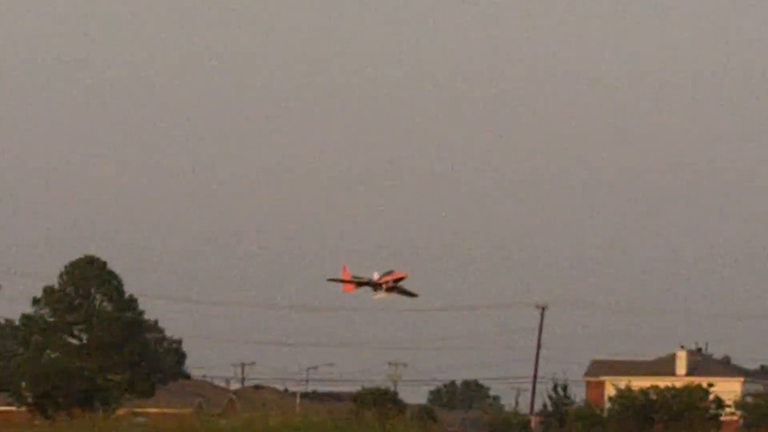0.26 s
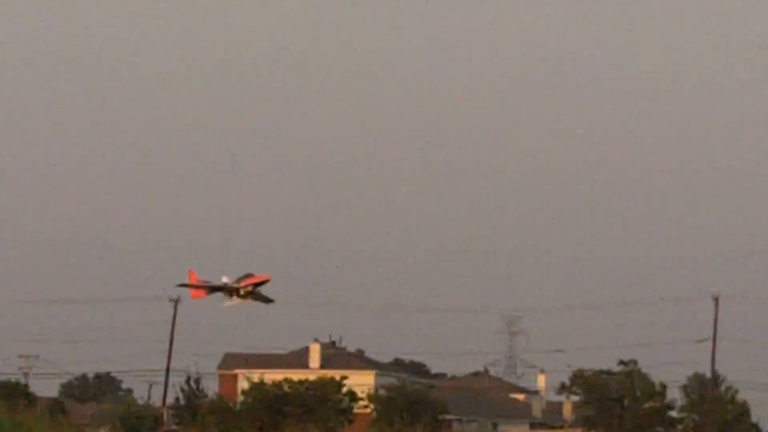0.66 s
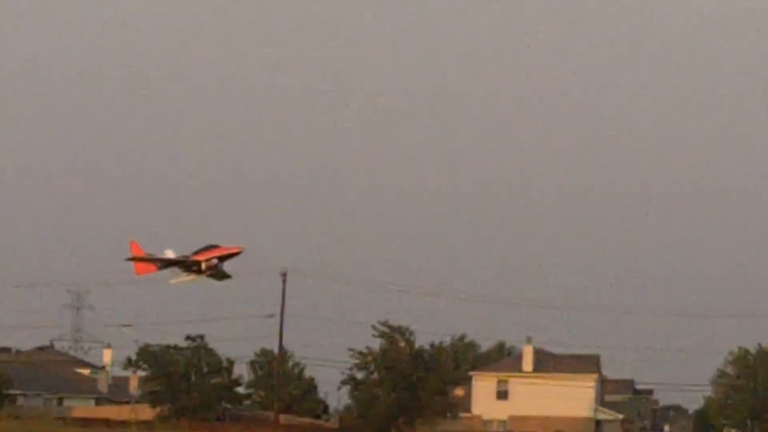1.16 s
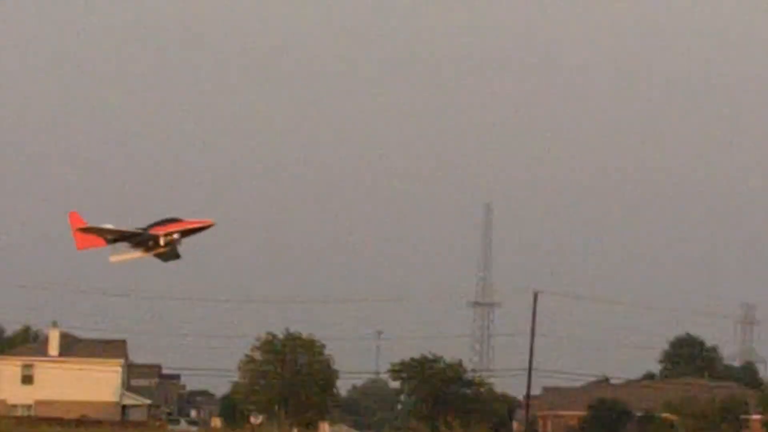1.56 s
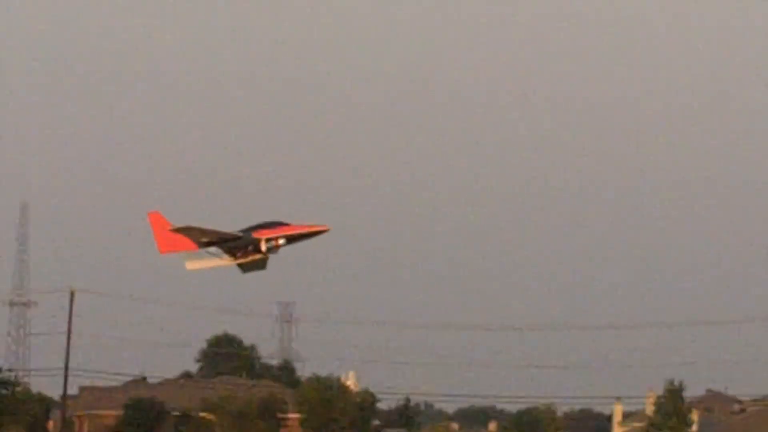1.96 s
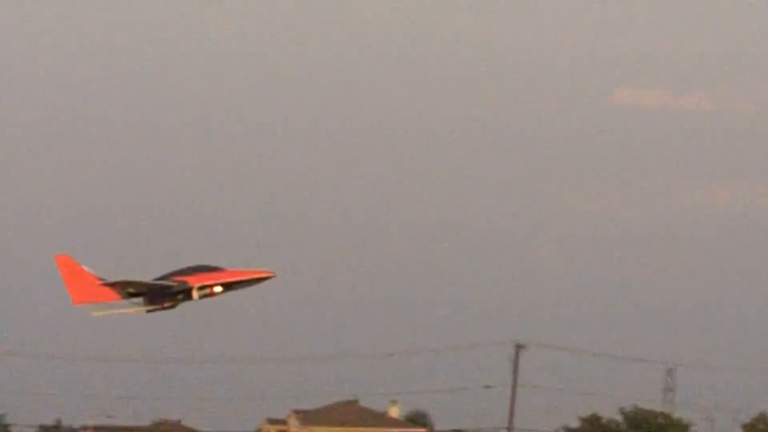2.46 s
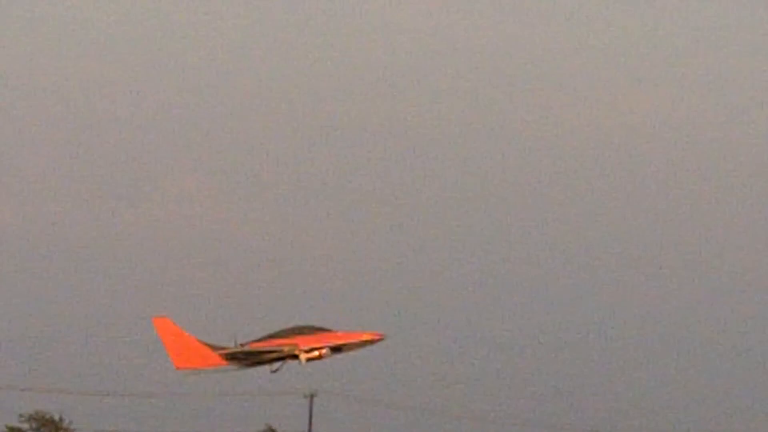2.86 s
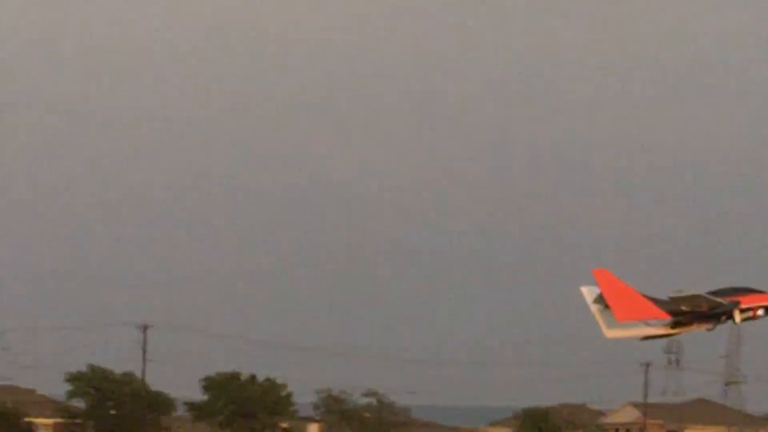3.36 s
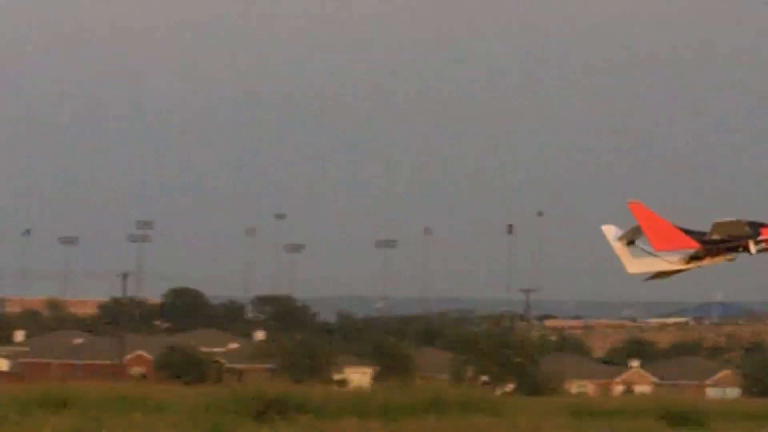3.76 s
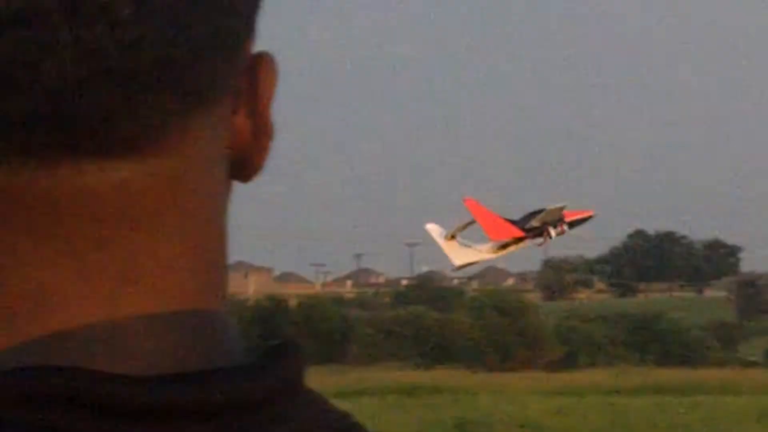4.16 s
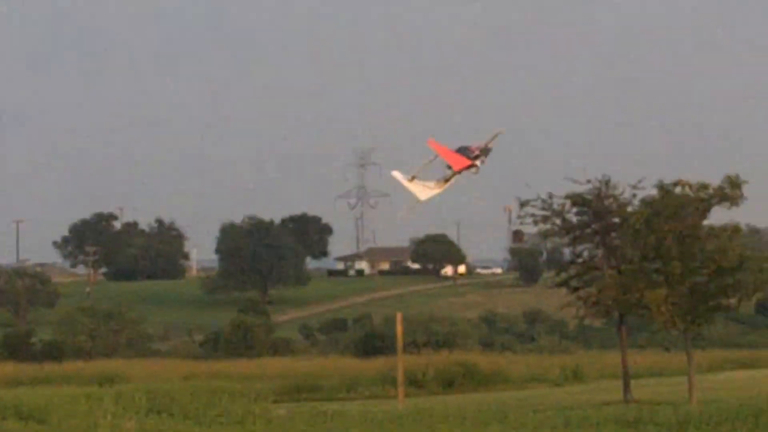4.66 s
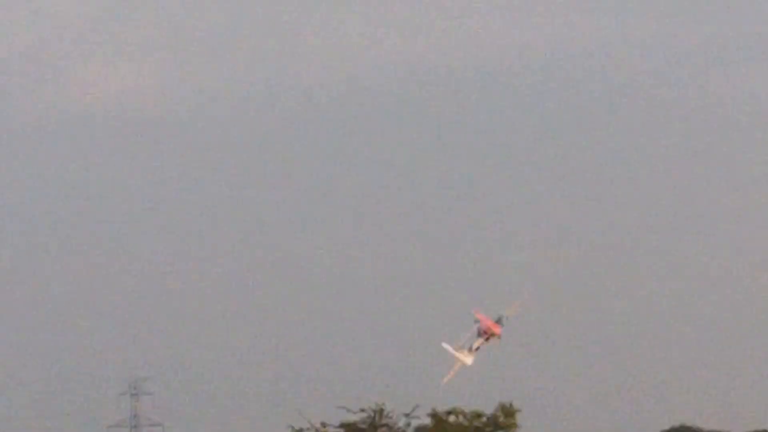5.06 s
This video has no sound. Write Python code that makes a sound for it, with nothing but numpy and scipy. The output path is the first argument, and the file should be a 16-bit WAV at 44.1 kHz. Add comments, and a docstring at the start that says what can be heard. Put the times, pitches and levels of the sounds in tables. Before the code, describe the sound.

Outdoors over an open grassy field, wind buffets a single microphone and one heavy low thump comes early. A small electric model plane approaches with a buzzing propeller hum and thin motor whine, speeds up around three seconds, passes, and leaves in airy hiss. Faint chirps and dull taps sound nearby; a sharp tick comes near the end.

```python
"""A small electric model plane with a two-blade propeller comes in over a field, in wind that buffets one microphone.
An early wind thump leads; then faint chirps and dull taps sound nearby, as enveloped sines and struck resonances.
The drive whine swells and the blade tones, sines on multiples of the shaft rate, rise as the throttle opens.
The plane passes and climbs away in a brighter hiss of filtered noise, and a sharp tick sounds near the end.
Below and around it lie a low drone that swells and a steady treble band, perhaps insects, both of noise."""
import sys
import numpy as np
from scipy import signal
from scipy.fft import rfft, irfft, next_fast_len
from scipy.io import wavfile
from scipy.ndimage import uniform_filter1d, map_coordinates

SR = 44100
rng = np.random.default_rng(int(sys.argv[2]) if len(sys.argv) > 2 else 0)


def transcribe(signal):
    """Save signal, clipped to [-1, 1], as a 16-bit WAV file at the path in sys.argv[1]."""
    frames = np.atleast_2d(signal).T
    limited = np.clip(frames, -1, 1)
    pcm = np.round(limited * 32767).astype(np.int16)
    wavfile.write(sys.argv[1], SR, pcm)


N = 234832
T = np.arange(N) / SR   # time [s]
SWING_FROM_DB = -52   # level from which blade tones and whine lines swing

# Buffeting of the microphone: (time [s], level [dB])
BUFFET_LEVEL = [(0, -33), (.08, -24), (.36, -24), (.46, -29), (.73, -39), (.89, -30.5), (1.2, -38.5),
                (1.39, -29.5), (1.7, -39.5), (2.05, -39.5), (2.95, -40), (3.1, -28), (3.33, -34.5),
                (3.5, -33), (4.09, -31), (4.2, -39.5), (4.55, -30.5), (4.76, -44), (4.99, -28), (5.32, -32)]
# Spectrum of the buffeting: (frequency [Hz], relative density [dB per Hz])
BUFFET_SPECTRUM = [(7.1, -4), (12, 7.5), (70, -13), (91, -74.5), (150, -120)]


def from_db(db):
    """Gain of a dB value."""
    return 10 ** (np.asarray(db) / 20)


def rms_one(x):
    """Scale to rms 1."""
    return x / np.sqrt(np.mean(x ** 2) + 1e-20)


def in_time(rows):
    """Columns of a curve table, sample by sample."""
    s, *columns = np.transpose(rows)
    return [np.interp(T, s, c) for c in columns]


def drift(rate_hz):
    """Slow random wander of rms 1: noise through two equal low-pass poles, computed on every 40th sample."""
    pole = np.exp(-2 * np.pi * rate_hz * 40 / SR)
    steps = rng.standard_normal(N // 40 + 2002)
    slow = signal.lfilter([1], [1, -2 * pole, pole ** 2], steps)[2000:]   # skip the run-in
    return np.interp(np.arange(N) / 40, np.arange(len(slow)), rms_one(slow))


def coloured(spectrum):
    """Noise with the given spectrum, rms 1."""
    size = next_fast_len(N)
    hz, db = np.transpose(spectrum)
    grid_hz = np.maximum(np.arange(size // 2 + 1) * SR / size, 1)
    shape = from_db(np.interp(np.log(grid_hz), np.log(hz), db, left=-90, right=-90))
    return rms_one(irfft(rfft(rng.standard_normal(size)) * shape, size)[:N])


def bump(middle_s, width_s, db):
    """A bell-shaped change of level in dB."""
    return db * np.exp(-((T - middle_s) / width_s) ** 2)


def fades_of(order, rows):
    """Sum of the momentary level changes listed for one order, in dB."""
    return sum(bump(*row[1:]) for row in rows if row[0] == order)


def swing(db, share, group_db):
    """Level in dB of a tone that follows its group's swing by a share; a negative share moves against it."""
    return SWING_FROM_DB + db + share * (group_db - SWING_FROM_DB)


def tone(phase, db, shimmer_db, blur_rad):
    """A sine around the given rms level that air turbulence shakes in level and phase."""
    gain = np.sqrt(2) * from_db(db + shimmer_db * drift(6.12))
    return gain * np.sin(phase + blur_rad * drift(5.3) + rng.uniform(0, 2 * np.pi))


def strike(at_s, level_db, contact_s, modes, smooth=0):
    """Each contact is a short dying rustle of force, on a smooth push if any, that rings the modes."""
    out, rustle = np.zeros(N), rng.standard_normal(N)
    for s, blow_db, length in zip(at_s, level_db, contact_s):
        part = slice(int(s * SR), int((s + .08) * SR))
        age = (T[part] - T[part][0]) / length
        push = (rustle[part] + smooth) * age * np.exp(-age) / np.sqrt(length * SR / 4)
        for hz, db, t60 in modes:
            r, w = from_db(-60 / (t60 * SR)), 2 * np.pi * hz / SR
            ring = signal.lfilter([0, np.sin(w)], [1, -2 * r * np.cos(w), r * r], push)
            out[part] += from_db(blow_db + db) * ring
    return out


def shaft_turn():
    """Angle of the propeller shaft in radians; the rotor's inertia rounds every change of speed."""
    # Shaft speed as heard: (time [s], rate [Hz])
    speed = [(0.05, 190.1), (0.22, 196.6), (0.45, 195), (0.65, 191.2), (0.85, 192.6), (1.45, 192),
             (1.85, 191.2), (2.27, 190.6), (2.45, 195.6), (2.87, 193.8), (2.95, 197.7), (3.15, 219.9),
             (3.35, 231.2), (3.76, 235.3), (4.08, 241.7), (4.3, 241), (4.72, 237.8), (4.95, 238.9),
             (5.3, 236.7)]
    shaft_hz = uniform_filter1d(in_time(speed)[0], size=3000)
    return 2 * np.pi * np.cumsum(shaft_hz) / SR


def blade_tones(turn):
    """The blades sound tones on multiples of the shaft rate, in three groups with their own levels."""
    # Group levels: (time [s], low tones [dB], middle tones [dB], high tones [dB])
    groups = [(0.05, -64.5, -52, -75), (0.65, -60.5, -53, -76.5), (0.9, -55.5, -51, -62),
              (1.4, -53, -50, -64), (1.65, -48, -53, -63), (2.25, -45, -66, -79), (2.5, -43.5, -62, -62),
              (2.9, -52, -63, -67.5), (3.15, -41.5, -71, -76.5), (3.4, -39.5, -58.5, -70),
              (3.8, -47, -62, -63), (4.1, -43.5, -54, -59), (4.4, -50, -61.5, -58),
              (4.75, -58.5, -52.5, -56.5), (5.3, -65, -56, -56)]
    # Tones that swing: (multiple of shaft rate, level re SWING_FROM_DB [dB], share of the group's swing)
    low_tones = [(3, -7.5, 0.345), (4, 0.3, 1), (6, -4, 0.348), (8, -6.5, 0.24)]
    middle_tones = [(10, -2, 0.42), (12, -0.65, 1), (14, -18, -0.25), (16, -17.5, -0.45)]
    # Higher tones: (multiple of shaft rate, level re the high curve [dB])
    high_tones = [(20, -10), (22, -11), (28, -11.5), (30, -9), (32, -9.5), (34, -14), (36, -8.5), (42, -18)]
    # Tones that drop out or stand out as the plane turns: (multiple, middle [s], width [s], change [dB])
    fades = [(3, 0.6, 0.24, -3.5), (3, 2.93, 0.24, 7.5), (3, 3.423, 0.17, -3.5), (3, 4.92, 0.21, -16.5),
             (4, 5.5, 0.0975, -21), (6, 3.18, 0.095, -28), (6, 4.25, 0.26, 3), (8, 0.62, 0.34, -6),
             (8, 2.224, 0.189, -10), (8, 2.88, 0.07, -12), (8, 3.07, 0.084, 10), (8, 2.8, 0.063, -24),
             (8, 3.45, 0.11, 3.5), (4, 4.63, 0.1204, 5), (12, 4.29, 0.17, 3), (14, 3.5, 0.058, 8),
             (8, 4.2, 0.15, 5), (10, 0.09, 0.38, -5.5), (4, 5.27, .08, 10), (10, 1.998, 0.14, -17),
             (10, 3.25, 0.162, -13), (10, 4.146, 0.118, -14), (12, 2.45, 0.11, -7),
             (12, 3.876, 0.0878, -25), (12, 4.4, 0.17, -3.5), (14, 0.5, 0.27, -14), (14, 3.2, 0.0985, -15),
             (14, 3.97, 0.23, 9), (14, 4.9, 0.12, 12), (16, 2.4, 0.206, 6.5), (16, 4.171, 0.121, 11.5),
             (16, 2.98, 0.1196, -10.5)]
    # Tones that surface for a while: (multiple, start [s], end [s], level at full swell [dB])
    passing = [(2, 2.5, 3.23, -54.5), (2, 5, 6.3, -57), (18, -17.5, 5.28, -59.5), (30, 2.5, 3.6, -74.5),
               (9, 3, 3.02, -60), (7, 3, 3.8, -52), (24, 3.5, 4.7, -54), (24, 5, 5.1, -56.5),
               (28, 5, 5.5, -62), (24, 0.8, 1.8, -67.5), (7, 4.5, 4.81, -59.5), (48, 2.5, 3.01, -66)]

    low_db, middle_db, high_db = in_time(groups)
    out = np.zeros(N)
    for group_db, tones in ((low_db, low_tones), (middle_db, middle_tones)):
        for k, db, share in tones:
            level_db = swing(db, share, group_db) + fades_of(k, fades)
            out += tone(k * turn, level_db, shimmer_db=1.0, blur_rad=0.32)
    for k, db in high_tones:
        # a slow random fade wavers each high tone
        level_db = high_db + db + 1.66 * drift(0.69)
        out += tone(k * turn, level_db, shimmer_db=4.5, blur_rad=0.98)
    for k, start, end, db in passing:
        swell = np.sin(np.pi * np.clip((T - start) / (end - start), 0, 1))
        out += swell * tone(k * turn, db, shimmer_db=1.5, blur_rad=0.237)
    return out


def drive_whine(turn):
    """The motor drive whines at its Doppler-shifted switching rate, with commutation sidebands above."""
    # Whine level: (time [s], level [dB])
    whine_level = [(0, -87), (.8, -76), (1.1, -76), (1.5, -69), (2.0, -75.5), (2.45, -55), (2.7, -57),
                   (3.0, -48.5), (3.27, -55.5), (3.36, -75), (3.45, -66), (3.55, -59.5), (3.85, -60),
                   (3.97, -72), (4.12, -63), (4.27, -75), (4.5, -62.5), (4.65, -83.5), (5.3, -74)]
    # Lines 0, 6 and 12 shaft orders up: (level re SWING_FROM_DB [dB], share of swing, gain flying away [dB])
    lines = [(-12, 0.35, 2.5), (0.1, 0.98, 4), (-15, 0.415, -7.5)]
    # Lines that drop out or stand out: (shaft orders up, middle [s], width [s], change [dB])
    fades = [(0, 3.28, 0.214, 10.5), (0, 3.7, 0.1575, 8), (12, 1.1, 1.2, 3), (12, 1.85, 0.056, -11),
             (12, 3.09, 0.092, 1), (12, 3.39, .1, -14), (12, 4.4, .5, -10)]
    switch_hz, speed_m_per_s, sound_m_per_s = 7557, 14.8, 343
    nearest_m, nearest_s = 44, 3.7

    along_m = speed_m_per_s * (T - nearest_s)
    away = along_m / np.hypot(along_m, nearest_m)   # -1 coming straight on, 1 flying straight off
    heard_hz = switch_hz * (1 - away * speed_m_per_s / sound_m_per_s)
    switch_phase = 2 * np.pi * np.cumsum(heard_hz) / SR
    whine_db, = in_time(whine_level)
    out = np.zeros(N)
    for k, (db, share, away_db) in zip((0, 6, 12), lines):
        line_db = swing(db, share, whine_db) + away_db * away + fades_of(k, fades)
        out += tone(switch_phase + k * turn, line_db, shimmer_db=1.5, blur_rad=0.19)
    return out


def patchy(x, patch_db, patch_hz, patch_s):
    """Slow random patches of the spectrum lift and dim, like turbulence."""
    hz, s, z = signal.stft(x, SR, nperseg=1024)
    knots = rng.standard_normal((90, 40))
    places = np.meshgrid(hz / patch_hz, s / patch_s, indexing="ij")
    field = map_coordinates(knots, places, order=3, mode="wrap")
    return signal.istft(z * from_db(patch_db * field), SR, nperseg=1024)[1][:N]


def airflow():
    """Propeller wash and wing noise: four noise bands that brighten once the plane shows its tail."""
    # Airflow: (time [s], level of the wash [dB], level of the top treble [dB])
    flow = [(0, -55.5, -67.5), (.9, -56, -64.5), (1.7, -58, -66.5), (1.85, -58.5, -68), (2.0, -56.5, -65),
            (2.9, -59.5, -67.5), (3.3, -56, -64), (3.6, -55.5, -62.5), (3.88, -55, -58),
            (3.96, -54.5, -64.5), (4.12, -52, -54), (4.27, -57, -67), (4.42, -52.5, -56),
            (4.55, -49, -57.5), (4.7, -47.5, -58), (4.9, -49, -58), (5.3, -51.5, -63)]
    # Spectra from low to high: (frequency [Hz], relative density [dB per Hz])
    body = [(120, -54), (200, 0), (281, -8.5), (380, -12.5), (455, -10.5), (919, -4.5), (1180, -5),
            (1910, -13.5), (2200, -20), (2860, -78), (4840, -120)]
    edge = [(1700, -1.5), (2200, 2), (2700, 0.5), (3200, -0.5), (3800, 0), (4600, -5), (5200, -6.5)]
    hiss = [(4000, -18.5), (4600, -5.5), (5200, -7), (5700, 2.5), (6000, 0), (6400, 2), (7000, -4.5),
            (7600, -5), (9000, -8.5)]
    top = [(7000, -15), (8000, -5.5), (9000, 0.5), (10000, -7), (11000, -11), (12500, -17.5), (15500, -34)]

    wash_db, top_db = in_time(flow)
    body_db = -48.5 - 0.21 * T   # sags slowly
    edge_db = -1 + np.interp(T - 0.11, T, wash_db)   # trails the wash by 0.11 s
    bands = ((body_db, body), (edge_db, edge), (wash_db, hiss), (top_db, top))
    noise = sum(from_db(db) * coloured(shape) for db, shape in bands)
    return patchy(noise, patch_db=1.7, patch_hz=455.6, patch_s=0.463)


def over_grass(x):
    """Direct sound plus an inverted ground echo: a comb whose teeth glide as the path changes."""
    # Echo off the grass: (time [s], delay [ms], level [dB])
    echo = [(0, .69, -14.5), (.9, 0.67, -14.5), (1.2, .74, -15), (1.7, 0.8, -9.5), (2.0, 0.802, -16.5),
            (2.3, .85, -17), (3.0, .88, -22), (3.6, 0.828, -15), (4.2, 0.83, -10), (4.6, 0.88, -9),
            (5.3, 0.94, -7.5)]
    delay_ms, echo_db = in_time(echo)
    late = map_coordinates(x, [np.arange(N) - delay_ms * SR / 1000], order=3, mode="nearest")
    late = signal.lfilter(*signal.butter(1, 8900, fs=SR), late)   # grass swallows the top
    return x - from_db(np.minimum(echo_db, 0)) * late


def dull_taps():
    """Soft contacts ring a few low modes, and brighter modes that die sooner."""
    # Taps: (time [s], relative level [dB], added level of the bright modes [dB], contact [s])
    taps = [(1.659, -34, -5, 0.0041), (1.741, -37.5, 1, 0.00433), (1.795, -37, 1, 0.004),
            (2.023, -33.5, -3.5, 0.0064), (2.438, -33, 0.5, 0.0044), (3.319, -25, -9.5, 0.0023)]
    # Modes: (frequency [Hz], relative level [dB], t60 [s])
    low_modes = [(281.6, 3.5, 0.08), (359, 3.5, 0.065), (461, 1, 0.064), (608.5, 0.5, 0.03)]
    bright_modes = [(963, 10.5, 0.0118), (1470, 6.5, 0.012), (2116, 7, 0.0053), (2920, 6.5, 0.0029)]
    s, db, bright_db, contact_s = np.transpose(taps)
    dull = strike(s, db - 9.5, contact_s, low_modes, smooth=0.17)
    return dull + strike(s, db + bright_db - 8.5, contact_s, bright_modes)


def chirps():
    """Each faint chirp is a sine whose pitch and level arch up and down again."""
    # Chirps: (middle [s], top pitch [Hz], fall to the ends [Hz], length [s], peak level [dB])
    calls = [(2.153, 2219, 244.5, 0.033, -53), (2.242, 2470, 505, .04, -52),
             (2.362, 2500, 249.8, 0.042, -58), (2.457, 2605, 598, 0.045, -54.5),
             (3.202, 1148, 49.57, 0.0766, -48.5), (4.131, 1295, 30, 0.035, -51.5),
             (4.203, 1200, 29.94, 0.044, -51.5), (4.301, 1230, 30, 0.058, -54),
             (4.552, 1246, 29.89, .05, -52), (1.542, 3735, 150, .04, -69), (1.638, 3800, 146.8, 0.045, -73),
             (1.976, 3600, 200.5, 0.0505, -54)]
    out = np.zeros(N)
    for middle, top_hz, fall_hz, length, db in calls:
        u = np.clip(2 * (T - middle) / length, -1, 1)   # -1 to 1 over the chirp
        phase = 2 * np.pi * np.cumsum(top_hz - fall_hz * u ** 2) / SR
        out += from_db(db) * np.sqrt(1 - u ** 2) * np.sin(phase)
    return out


def sharp_tick():
    """A very short contact and its bounce ring high modes; the extreme top is rolled off."""
    # Tick and bounce: (time [s], relative level [dB])
    hits = [(5.2524, -21.5), (5.2539, -25)]
    # Modes: (frequency [Hz], relative level [dB], t60 [s])
    modes = [(2600, -20, 0.013), (3600, -11.5, 0.019), (5955, -21, 0.018), (6100, -7, 0.017),
             (6600, -3.5, 0.017), (7500, -23, 0.013), (9210, -12, .005)]
    tick = strike(*np.transpose(hits), (.0003, .0004), modes)
    return signal.sosfilt(signal.butter(4, 9500, fs=SR, output="sos"), tick)


def wind():
    """Buffeting and rumble on the membrane, with single strong eddies as thumps."""
    # Rumble: (time [s], level [dB])
    rumble_level = [(0, -35.5), (.3, -34), (1.1, -37), (1.5, -39.5), (2.0, -37.5), (2.5, -38), (3.0, -37.5),
                    (3.4, -39), (3.9, -33), (4.3, -34.5), (4.7, -36), (5.0, -38), (5.32, -38)]
    # Spectrum of the rumble: (frequency [Hz], relative density [dB per Hz])
    rumble_spectrum = [(26, -35), (45, 2), (97, -2), (123, -8.5), (188, -8.5), (273, -23.5), (375, -17),
                       (420, -25), (550, -33), (920, -120)]
    # Thumps, a crest and a slower rebound:
    # (time [s], level [dB], swing [Hz], slowing [Hz per s], width [s], push 1 or pull -1)
    thumps = [(0.285, -6.5, 48, 500, 0.0096, 1), (.88, -20, 47, 500, 0.011, 1),
              (1.39, -19, 28, 300, 0.017, -1), (3.845, -21, 49.01, 400, 0.011, -1)]

    buffet_db, = in_time(BUFFET_LEVEL)
    rumble_db, = in_time(rumble_level)
    out = from_db(buffet_db) * coloured(BUFFET_SPECTRUM)
    out += from_db(rumble_db + 1.43 * drift(3.9)) * coloured(rumble_spectrum)
    for s, db, hz, slowing, width, way in thumps:
        u = T - s
        envelope = np.exp(-(u / width - .3) ** 2)
        out += way * from_db(db) * envelope * np.cos(2 * np.pi * (hz * u - slowing * u ** 2 / 2))
    return out


def side_buffeting():
    """Fainter buffeting, to be added with opposite sign in the two channels."""
    return from_db(in_time(BUFFET_LEVEL)[0] - 30) * coloured(BUFFET_SPECTRUM)


def treble_band():
    """A steady band of treble noise, perhaps insects, that wavers slightly."""
    # Spectrum: (frequency [Hz], relative density [dB per Hz])
    band = [(6500, -17.5), (7400, 2.5), (8000, 10.5), (8600, 0), (9500, -31)]
    return from_db(-58 + .5 * drift(1.2)) * coloured(band)


def drone():
    """A distant low drone: noise passed twice through one narrow resonance."""
    # Drone: (time [s], level [dB])
    drone_level = [(0, -45), (2.8, -47.5), (3.3, -36), (3.8, -47.5), (4.4, -45.5), (5.3, -38)]
    centre_hz, width_hz = 97.81, 7.5   # width of each pass
    b, a = signal.iirpeak(centre_hz, centre_hz / width_hz, fs=SR)
    once = signal.lfilter(b, a, rng.standard_normal(N))
    return from_db(in_time(drone_level)[0]) * rms_one(signal.lfilter(b, a, once))


def scene():
    """Nearly all is alike in both channels; the near tick leans to one side and the buffeting differs a little."""
    turn = shaft_turn()
    plane = blade_tones(turn) + drive_whine(turn) + airflow()
    mono = over_grass(plane) + dull_taps() + chirps() + wind() + treble_band() + drone()
    sides = np.array([[1], [-1]])
    return mono + sharp_tick() * from_db(.15 * sides) + side_buffeting() * sides


def record(dry):
    """The port cancels a band near 4 kHz; each channel adds faint treble noise; the top is cut; small offset."""
    notch_hz, notch_width_hz, notch_left = 4232, 2150, 0.024   # notch_left: gain left at the centre
    b, a = signal.iirnotch(notch_hz, notch_hz / notch_width_hz, fs=SR)
    x = notch_left * dry + (1 - notch_left) * signal.lfilter(b, a, dry)
    white = from_db(-75) * rng.standard_normal((2, N))
    x = x + signal.sosfilt(signal.butter(4, 11000, "high", fs=SR, output="sos"), white)
    top_cut = signal.ellip(12, .1, 85, 15200, fs=SR, output="sos")   # ripple .1 dB, stop 85 dB, edge 15200 Hz
    return signal.sosfilt(top_cut, x) + .01


dry = scene()
out = record(dry)
transcribe(out)
```